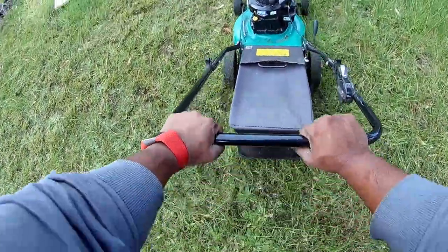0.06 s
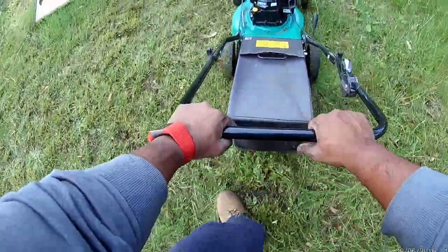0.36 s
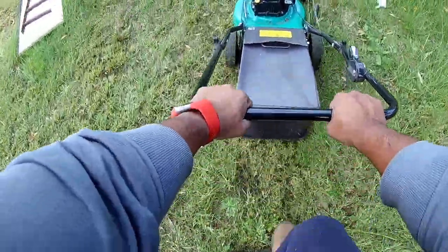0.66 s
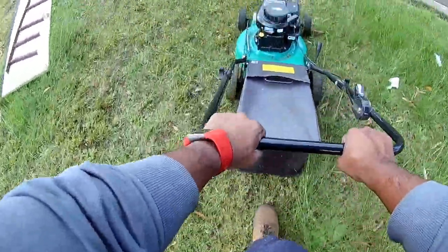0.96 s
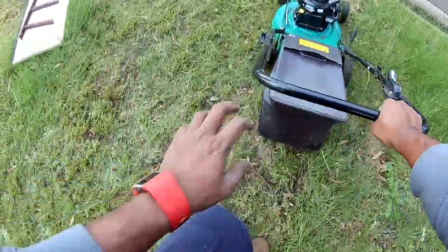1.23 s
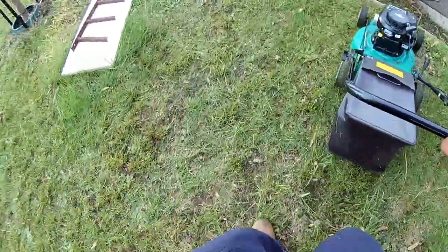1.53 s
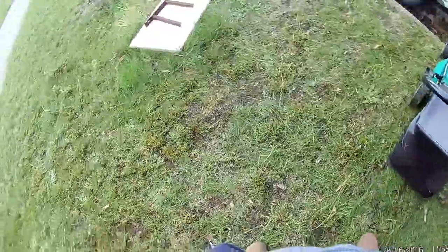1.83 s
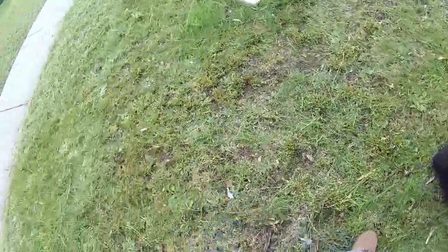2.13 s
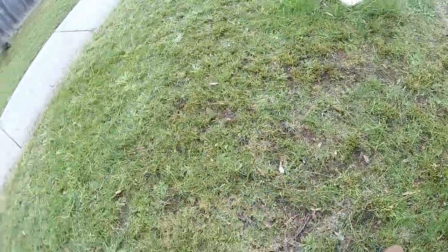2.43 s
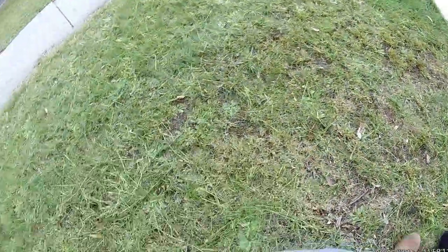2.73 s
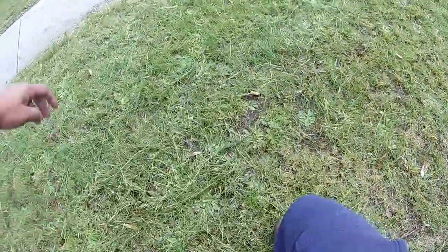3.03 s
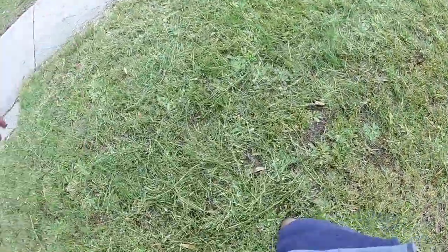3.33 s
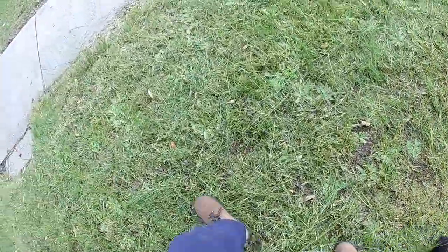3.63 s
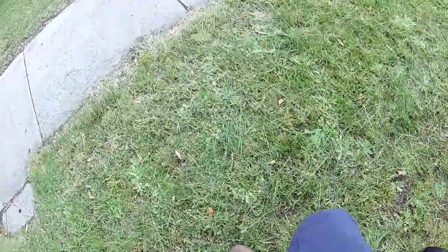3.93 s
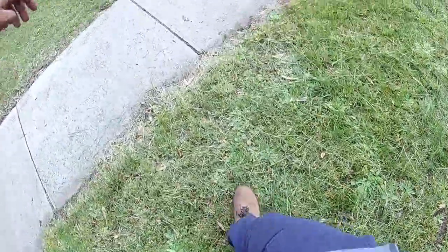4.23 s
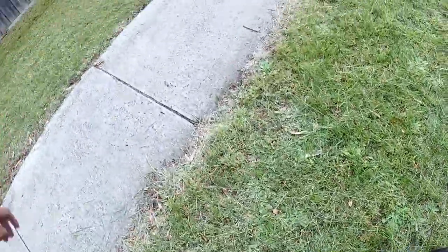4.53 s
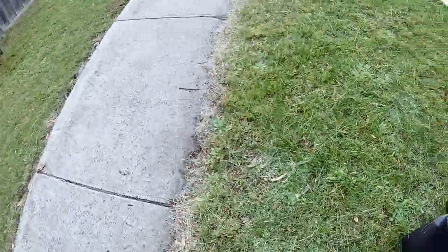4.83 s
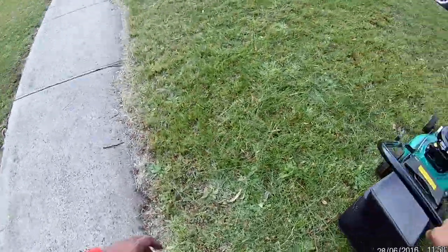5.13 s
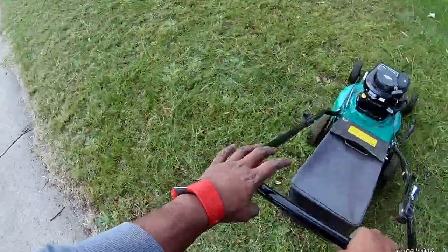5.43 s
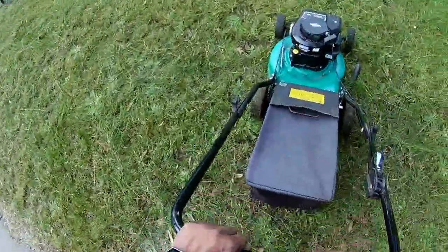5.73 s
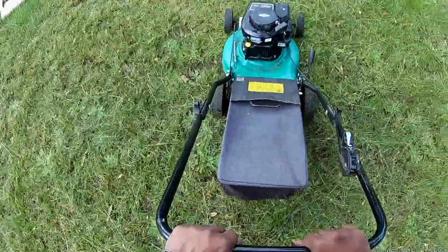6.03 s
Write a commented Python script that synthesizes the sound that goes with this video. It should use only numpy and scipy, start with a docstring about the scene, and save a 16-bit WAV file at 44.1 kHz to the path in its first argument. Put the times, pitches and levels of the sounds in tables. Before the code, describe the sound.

A single-cylinder petrol lawn mower runs close by on a lawn, with a throbbing exhaust and a droning blade. The engine sags briefly under load and recovers, then the blade strikes debris with one hard knock. The roar turns softer and duller as the mower swings aside, with a few faint snaps of dry stalks. It swells again near the end, rasping through grass with a few smaller knocks.

```python
"""On a lawn, a one-cylinder four-stroke mower is pushed along, swung aside and brought back in front.
Every firing knocks the engine block and sends a puff through the muffler; the blade roars in the deck,
its steel housing. Valves tick, loose tin buzzes, clippings patter and dry stalks snap.
The speed sags and recovers with the load, and the blade strikes bits of debris, once hard."""
import sys
import numpy as np
from scipy import signal
from scipy.fft import rfft, irfft, next_fast_len
from scipy.io import wavfile
from scipy.ndimage import map_coordinates

SR = 44100
rng = np.random.default_rng(int(sys.argv[2]) if len(sys.argv) > 2 else 0)


def unload_audio(sound):
    """Save the sound as a 16-bit wav file, at the path given as the first command line argument."""
    columns = np.transpose(np.atleast_2d(sound))
    # keep every value between -1 and 1, then stretch to whole-number steps
    steps = np.round(np.clip(columns, -1, 1) * 32767)
    wavfile.write(sys.argv[1], SR, steps.astype(np.int16))


N = 276507


def amp(db):
    """Turn decibels into a number to multiply by."""
    return 10 ** (np.asarray(db) / 20)


def unit(x):
    """Scale a sound to an average (rms) size of 1."""
    return x / np.sqrt(np.mean(x ** 2) + 1e-20)


def noise():
    """Fresh white noise."""
    return rng.standard_normal(N)


def curves(rows):
    """Join a table's points in time: one curve for each column after the first."""
    times, *columns = np.transpose(rows)
    return [np.interp(np.arange(N) / SR, times, column) for column in columns]


def swell(at_s, half_length_s):
    """A bell-shaped rise and fall, 1 at its top."""
    return np.exp(-((np.arange(N) / SR - at_s) / half_length_s) ** 2)


def wobble(per_s):
    """A smooth curve through per_s random points a second."""
    coarse = np.arange(0, N + 256, 256)
    points = rng.standard_normal(int(N * per_s / SR) + 4)
    return np.interp(np.arange(N), coarse, map_coordinates(points, [coarse * per_s / SR]))


def filtered(x, response):
    """Multiply each frequency in x by response(hz)."""
    size = 2 * next_fast_len(N // 2 + SR // 4)
    return irfft(rfft(x, size) * response(np.fft.rfftfreq(size, 1 / SR)), size)[:N]


def dulled(x, above_hz, steepness):
    """Turn down the treble."""
    return filtered(x, lambda hz: 1 / (1 + (hz / above_hz) ** steepness))


def coloured(x, points, size=8192):
    """Give x a tone colour (f/Hz, level/dB), at size 1."""
    point_hz, db = np.transpose(points)
    hz = np.fft.rfftfreq(size, 1 / SR)
    gain = amp(np.interp(np.log(hz + 1), np.log(point_hz), db))
    # make the filter ring only after a hit, never before it
    cepstrum = irfft(np.log(gain))[:size // 2]
    cepstrum[1:] *= 2
    ring = irfft(np.exp(rfft(cepstrum, size)))
    return unit(signal.oaconvolve(x, ring)[:N])


def resonated(x, notes, size=8192):
    """Let x ring at some notes (f/Hz, width/Hz, level/dB), at size 1."""
    f = np.fft.rfftfreq(size, 1 / SR)
    response = sum((-1) ** k * amp(db) * 1j * f * width / (hz * hz - f * f + 1j * f * width)
                   for k, (hz, width, db) in enumerate(notes))
    return unit(signal.oaconvolve(x, irfft(response))[:N])


def snapped(impulses, fade_s):
    """Give each impulse the outline of a click, dying by 60 dB in fade_s."""
    t = np.arange(SR // 20) / SR
    return signal.fftconvolve(impulses, amp(-60 * t / fade_s))[:N]


def pulses(cycle, lead, scatter_db, jitter_s):
    """One kick per firing, lead cycles early, uneven in strength and timing."""
    at = np.flatnonzero(np.diff(np.floor(cycle + lead)))
    chance = rng.standard_normal((len(at), 2))
    at = np.clip(at + chance[:, 0] * jitter_s * SR, 0, N - 1).astype(int)
    return unit(np.bincount(at, amp(scatter_db * chance[:, 1]), N))


def throbbing(cycle, bursts, scatter_db):
    """Steady noise plus uneven bursts (delay/cycles, half length/cycles, level/dB) in every cycle."""
    power = np.ones(N)
    for delay, half_length, db in bursts:
        nearest = np.round(cycle - delay).astype(int)
        strength = amp(db + scatter_db * rng.standard_normal(size=256))[nearest]
        power += strength ** 2 * np.exp(-((cycle - delay - nearest) / half_length) ** 2)
    return unit(np.sqrt(power) * noise())


def tones(cycle, multiples, waver_db, drift_rad, per_s):
    """Pure tones that follow the shaft, wavering in level and phase."""
    return sum(np.sqrt(2) * amp(db + waver_db * wobble(per_s))
               * np.cos(2 * np.pi * round(k) * cycle + drift_rad * wobble(per_s)) for k, db in multiples)


# a second, longer path for the treble, longer still with the mower aside: t/s, extra delay/ms, gain
LONGER_PATH = [(0, 0.27, 0.48), (1.5, 0.24, 0.45), (1.8, .305, 0.2), (2.05, 0.37, .62), (2.7, .4, 0.5),
               (4.7, .39, 0.6), (5.3, 0.35, 0.3), (5.55, 0.26, 0.55)]
def echoed(x):
    """Panels ring briefly; the longer path cuts dips into the treble that slide as the mower swings."""
    t = np.arange(SR // 20) / SR
    tail = rng.standard_normal(len(t)) * amp(-60 * t / 0.05)
    x = x + amp(-10) * signal.fftconvolve(x, tail / np.linalg.norm(tail))[:N]
    delay_ms, gain = curves(LONGER_PATH)
    late = map_coordinates(dulled(x, 7400, steepness=12), [np.arange(N) - delay_ms * SR / 1000])
    return unit(x + gain * late)


# engine speed, as the grass drags it down and the governor pulls it back: t/s, firing rate/Hz
ENGINE_SPEED = [(0.0, 24.11), (0.28, 22.73), (0.5, 23.44), (0.66, 23.06), (0.78, 20.65), (0.89, 22.12),
                (1.0, 22.7), (1.24, 26.0), (1.64, 23.01), (2.2, 25.16), (2.65, 25.28), (3.88, 24.51),
                (4.12, 22.45), (4.35, 24.39), (5.09, 24.61), (5.21, 23.79), (5.38, 23.63), (5.55, 24.63),
                (5.76, 23.84), (5.97, 25.55), (6.12, 23.93), (6.27, 22.78)]
def crankshaft():
    """Count engine cycles: each is one firing and two turns of the shaft."""
    return .195 + np.cumsum(curves(ENGINE_SPEED)[0]) / SR


# tone colour of the muffler: f/Hz, level/dB
MUFFLER_COLOUR = [(30, -47.5), (80, -20.5), (100, -2.5), (122, 3.5), (150, 3.5), (200, 5), (290, -11),
                  (400, -24.5), (1200, -33), (3000, -90)]
# hum of the shaft, and of blade tips passing four times a firing: multiple of firing rate, level/dB
SHAFT_HUM = [(1, -30.5), (2, -15.5), (3, -21)]
BLADE_HUM = [(4, -18), (8, -15.5)]
# the exhaust fades only a little, because bass bends round the walker: t/s, level/dB
EXHAUST_LOUDNESS = [(0, -23.8), (1, -22.5), (1.6, -27.5), (2.3, -26), (2.9, -28.5), (4.4, -26.5),
                    (5.2, -27), (5.9, -22)]
def exhaust(cycle):
    """Each puff rings the muffler and a weaker surge follows; gas rushes on over a low hum."""
    puffs = pulses(cycle, lead=.08, scatter_db=1.4, jitter_s=.0002)
    surge = pulses(cycle, lead=-.11, scatter_db=1.5, jitter_s=.0003)
    rush = coloured(noise(), [(25, -28), (45, -13), (85, -16), (130, -5), (215, 0), (600, -40),
                              (1500, -110)])
    shaft = tones(cycle, SHAFT_HUM, waver_db=1.1, drift_rad=.08, per_s=3.2)
    blade = tones(cycle, BLADE_HUM, waver_db=2.5, drift_rad=.6, per_s=5)
    muffler = coloured(-puffs - amp(-7) * surge, MUFFLER_COLOUR)
    return amp(curves(EXHAUST_LOUDNESS)[0]) * (muffler + shaft + blade + amp(-9) * rush)


# knocks within each engine cycle: delay/cycles, half length/cycles, level/dB
KNOCK_BURSTS = [(-.125, 0.013, 6), (-.01, 0.08, -3), (0.189, 0.2, 0.5)]
# tone colour of the engine block: f/Hz, level/dB
BLOCK_COLOUR = [(260, -38.5), (480, -6), (580, -2.5), (700, 1), (860, -3), (1000, -12.5), (1150, -26.5),
                (3000, -87.5)]
# how loudly it knocks: t/s, level/dB
BLOCK_LOUDNESS = [(0, -23.5), (2.35, -25), (3.2, -30), (4.1, -26), (6.27, -27)]
def block_knock(cycle):
    """Burning fuel and the slapping piston knock the engine block, never twice alike."""
    slap = pulses(cycle, lead=.125, scatter_db=3.5, jitter_s=.0005)
    knocks = throbbing(cycle, KNOCK_BURSTS, scatter_db=2) + amp(-7.5) * slap
    return amp(curves(BLOCK_LOUDNESS)[0]) * coloured(knocks, BLOCK_COLOUR)


# the block's own note: f/Hz, width/Hz, level/dB
BLOCK_NOTE = [(711.3, 8.8, 0)]
def block_ring(cycle, facing_db):
    """The knocks keep the block ringing on one note."""
    ring = resonated(throbbing(cycle, KNOCK_BURSTS, scatter_db=1.5), BLOCK_NOTE)
    return amp(-32 + 0.96 * facing_db) * ring


# notes of the air and steel of the deck: f/Hz, width/Hz, level/dB
DECK_NOTES = [(259.4, 125, -5.5), (355.7, 50, 1.5), (409.6, 50, 0.5), (489.7, 56.6, -2)]
# the blade's higher tones: multiple of firing rate, level/dB
BLADE_DRONE = [(12, -11), (16, -12), (20, -25.5)]
# the roar eases over uneven grass: t/s, half length/s, level change/dB
ROAR_DIPS = [(0.0, 0.19, -2), (1.652, 0.044, -6), (2.314, 0.063, -4), (4.4, 0.14, -4.5)]
def deck_roar(cycle, facing_db):
    """Firings shake the deck while the blade churns the air inside it, drones and sings."""
    shake = pulses(cycle, lead=0.2015, scatter_db=1.5, jitter_s=0.00045)
    churn = throbbing(cycle, [(-.17, 0.11, -2.5), (.1, 0.23, -1)], scatter_db=1)
    roar = resonated(churn + amp(-13) * shake, DECK_NOTES)
    roar = coloured(roar, [(80, -12), (200, 0), (600, -1), (1100, -17.5), (2500, -30)])
    drone = tones(cycle, BLADE_DRONE, waver_db=3, drift_rad=.6, per_s=8)
    song, power = blade_song(cycle)
    # a singing tone takes its power from the roar
    sound = (amp(-2) * roar + drone / (1 + power) + song) / np.sqrt(1 + 0.5 * power)
    dip_db = sum(db * swell(at_s, half_s) for at_s, half_s, db in ROAR_DIPS)
    return amp(-13 + dip_db + 1.194 * facing_db) * sound


# tone colour of the cutting: f/Hz, level/dB
RASP_COLOUR = [(700, -46), (1050, 5), (1350, -1.5), (1650, 1.5), (2300, -13), (2650, -20), (3300, -40.5),
               (6000, -65.5)]
def blade_rasp(cycle, facing_db):
    """The blade rasps, harder near the end as it is pushed into longer grass."""
    bite_db = 6 * swell(at_s=6.34, half_length_s=0.84)
    rasp = coloured(throbbing(cycle, KNOCK_BURSTS, scatter_db=1.5), RASP_COLOUR)
    return amp(-39.5 + bite_db + 1.4 * facing_db) * echoed(rasp)


# exhaust puffs within each engine cycle: delay/cycles, half length/cycles, level/dB
PUFF_BURSTS = [(0, 0.027, 6), (.19, 0.06, -5)]
# tone colour of their hiss: f/Hz, level/dB
HISS_COLOUR = [(2000, -40.5), (2700, 1.5), (4600, -1), (5300, -4), (6500, -2), (7400, -13.5), (9000, -28.5),
               (11200, -25.5), (12800, -51.5)]
def puff_hiss(cycle, facing_db):
    """A high hiss flares with every puff."""
    hiss = coloured(throbbing(cycle, PUFF_BURSTS, scatter_db=4.5), HISS_COLOUR)
    return amp(-50.5 + 0.8 * facing_db) * echoed(hiss)


# notes of the loose tin on top of the engine: f/Hz, width/Hz, level/dB
TIN_NOTES = [(3400, 290, 5), (4400, 210, 5)]
def tin_rattle(cycle, facing_db):
    """Loose tin buzzes with every puff, heard mostly from the front."""
    buzz = resonated(throbbing(cycle, PUFF_BURSTS, scatter_db=2.5), TIN_NOTES)
    return amp(-52.5 + 1.43 * facing_db) * echoed(unit(dulled(buzz, 4900, steepness=16)))


# notes of the thin steel engine cover: f/Hz, width/Hz, level/dB
COVER_NOTES = [(1278, 80, 9.5), (1927, 245, 2.5), (2235, 170, 5), (2590, 74, 0)]
def cover_ring(cycle, facing_db):
    """The knocks shake the cover, which sends its sound sideways: loudest when partly turned away."""
    best_facing_db = -6.5
    level_db = -47.5 - 0.4 * np.abs(facing_db - best_facing_db)
    ring = resonated(throbbing(cycle, KNOCK_BURSTS, scatter_db=-1.5), COVER_NOTES)
    return amp(level_db) * dulled(ring, 3000, steepness=8)


# the ticking is hardest when the engine labours in front: t/s, level/dB
TICK_LOUDNESS = [(0, -70), (.86, -57.5), (1.2, -57.5), (1.45, -64), (1.85, -63), (3.1, -80), (4.9, -73),
                 (5.35, -62), (6.27, -63.5)]
# notes of the cooling fins: f/Hz, width/Hz, level/dB
FIN_NOTES = [(2670, 43, -2), (3100, 76, 8.5), (4230, 120, -6.5)]
def valve_ticks(cycle):
    """The exhaust valve ticks as it opens and more faintly as it closes; the fins ring along."""
    opening = pulses(cycle, lead=.015, scatter_db=2, jitter_s=.0008)
    closing = pulses(cycle, lead=-.18, scatter_db=3, jitter_s=.0008)
    clicks = snapped(opening + amp(-8) * closing, fade_s=.016) * noise()
    bright = coloured(clicks, [(1500, -29.5), (3500, -1), (6800, 6), (8800, -1), (11300, -.5),
                               (12800, -22)])
    fins = dulled(resonated(clicks, FIN_NOTES), 6000, steepness=8)
    return amp(curves(TICK_LOUDNESS)[0]) * echoed(bright + amp(-7) * fins)


# dry stalks breaking: t/s, level/dB
STALK_SNAPS = [(1.782, -55), (1.829, -46), (2.352, -48.5), (2.602, -50), (3.093, -56), (4.549, -50),
               (5.069, -51)]
def grass(clippings_per_s=30, clippings_db=-66):
    """Clippings patter at random, and now and then a dry stalk snaps."""
    patter = (rng.random(N) < clippings_per_s / SR) * amp(clippings_db + 3 * noise())
    times, db = np.transpose(STALK_SNAPS)
    snaps = np.bincount((times * SR).astype(int), amp(db), N)
    crisp = coloured(noise(), [(2000, -20), (5000, -1), (7000, 0), (8800, -7), (11300, -8), (13000, -32)])
    return snapped(patter + snaps, fade_s=.022) * crisp


# blade tones that sing out: t/s, half length/s, multiple of firing rate, level/dB
SUNG_TONES = [(0.26, 0.045, 12, -2), (0.265, 0.051, 16, 0), (0.571, 0.042, 16, 1), (0.992, 0.033, 16, 2),
              (2.31, 0.12, 8, -8), (2.446, 0.17, 16, -1.5), (2.583, 0.043, 12, 3), (3.407, 0.041, 12, 3.5),
              (3.662, 0.028, 16, 3), (3.86, 0.061, 12, 0.5), (4.268, 0.12, 12, -2), (4.794, 0.23, 16, -3),
              (5.74, 0.23, 16, -0.5), (5.978, 0.025, 12, 2)]
def blade_song(cycle):
    """Single blade tones swell up and die away; returns their sum and its power."""
    sound, power = 0, 0
    for at_s, half_s, multiple, db in SUNG_TONES:
        strength = amp(db) * swell(at_s, half_s)
        phase = 2 * np.pi * round(multiple) * cycle + 0.3 * wobble(7)
        sound += strength * np.sqrt(2) * np.sin(phase)
        power += strength ** 2
    return sound, power


# hits on the blade, with crack and ring levels counted from the hit's level:
# t/s, level/dB, rise/s, boom's fade by 60 dB/s, crack level/dB, ring f/Hz, ring level/dB
DEBRIS_HITS = [(1.304, -5, 0.0088, 0.078, -17.5, 437, 4), (1.2995, -8, .001, 0.035, -17.5, 873, 1),
               (1.342, -13, 0.039, 0.25, -29, 696, -3.5), (5.289, -36, 0.0016, 0.037, 0.5, 3580, -22),
               (5.853, -24, 0.0027, 0.047, -10, 4700, -24), (5.877, -21, 0.0006, 0.016, -7, 4640, -11),
               (6.023, -11, 0.0022, 0.072, -22, 1570, -17)]
# tone colours of the boom and the crack: f/Hz, level/dB
BOOM_COLOUR = [(60, -18.5), (200, -12.5), (330, -4), (450, 2), (900, -2), (1150, -16.5), (2000, -28.5),
               (6000, -89.5)]
CRACK_COLOUR = [(500, -35.5), (1000, 13.5), (1700, 3.5), (4200, -1.5), (5300, -13), (6500, -16.5),
                (11000, -33), (16000, -65.5)]
def debris_strikes():
    """Debris flies into the blade: a crack, a boom, and the ring of whichever steel part it hits."""
    t = np.arange(N) / SR
    boom, crack, ring = np.zeros((3, N))
    for at_s, db, rise_s, fade_s, crack_db, ring_hz, ring_db in DEBRIS_HITS:
        near = np.abs(t - at_s) < .5
        age = t[near] - at_s
        shape = np.exp(np.minimum(age, 0) / rise_s) * amp(-60 * np.maximum(age, 0) / fade_s)
        boom[near] += amp(db) * shape
        # powers below 1 make the crack and ring fade a little more slowly than the boom
        crack[near] += amp(db + crack_db) * shape ** 0.85
        ring[near] += amp(db + ring_db) * shape ** 0.79 * np.sin(2 * np.pi * ring_hz * age)
    boom *= amp(-5) * coloured(noise(), BOOM_COLOUR)
    crack *= coloured(noise(), CRACK_COLOUR)
    return boom + crack + ring


# how squarely the mower faces the listener, lowest when swung aside: t/s, level/dB
FACING = [(0.0, -2), (0.3, -3), (0.7, -1.5), (0.96, 0), (1.5, -3.5), (2.45, -7.5), (2.95, -11.5),
          (3.4, -14.5), (3.85, -9.5), (4.25, -10.5), (5.0, -8.5), (5.45, -5), (5.7, -2.5), (6.02, -2),
          (6.27, -5)]
def scene():
    """All engine sounds follow one shaft, and each fades by its own amount as the mower swings aside."""
    cycle = crankshaft()
    facing_db, = curves(FACING)
    parts = (blade_rasp, puff_hiss, block_ring, deck_roar, tin_rattle)
    mower = sum(part(cycle, facing_db) for part in parts)
    mower += exhaust(cycle) + block_knock(cycle) + cover_ring(cycle, facing_db) + valve_ticks(cycle)
    return (mower + debris_strikes() + grass())[None]


def record(dry):
    """The microphone's opening cuts out a narrow band and dulls the top; the amplifier hisses faintly."""
    notch_hz, top_hz = 7900, 15800
    x = filtered(dry[0], lambda hz: 1 - np.exp(-((hz - notch_hz) / 330) ** 2))
    x = dulled(x, 13300, steepness=12) + amp(-76) * noise()
    x = x / (1 + np.abs(x) ** 10) ** (1 / 10)  # peaks flatten at full scale
    return filtered(x, lambda hz: hz < top_hz)[None]


dry = scene()
out = record(dry)
unload_audio(out)
```